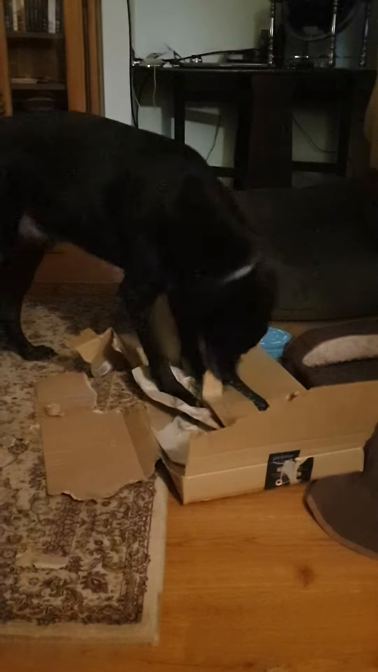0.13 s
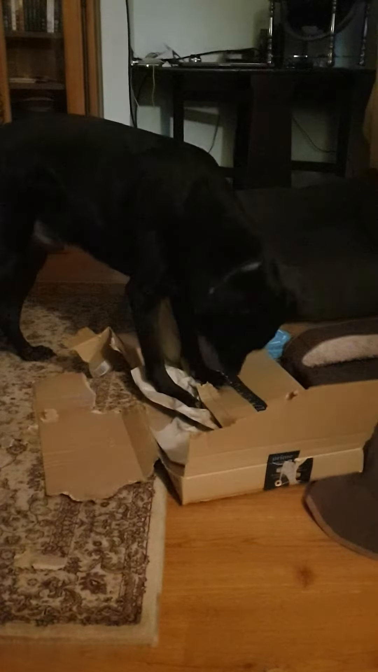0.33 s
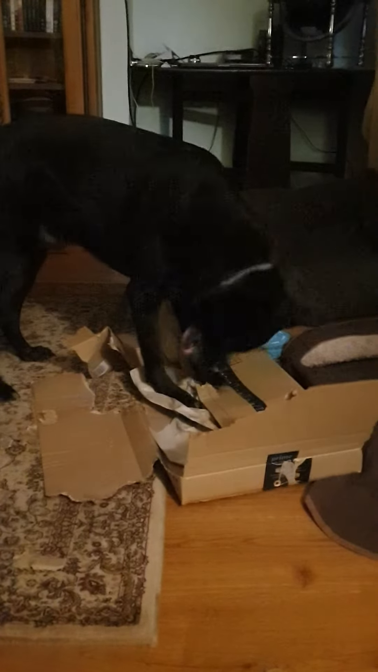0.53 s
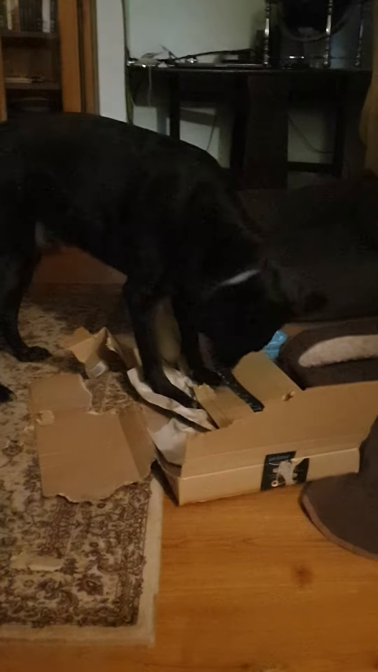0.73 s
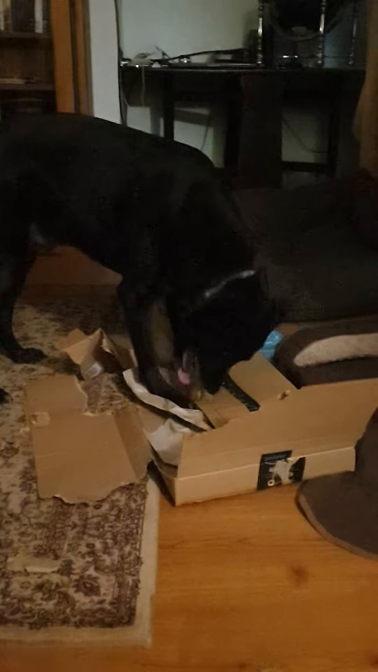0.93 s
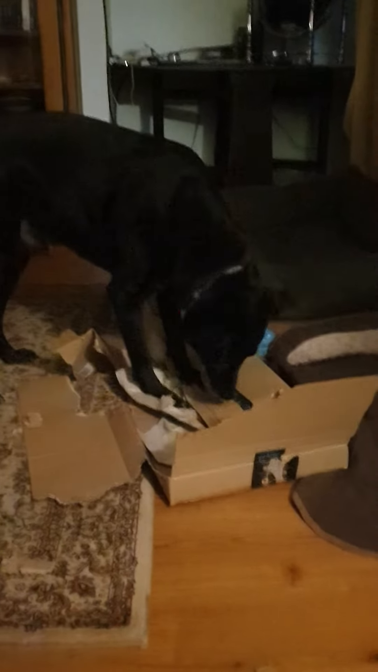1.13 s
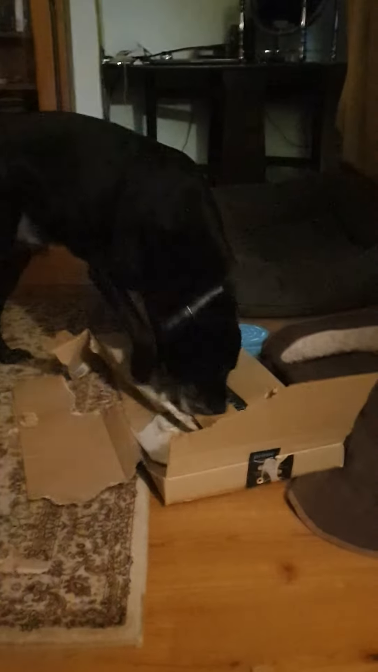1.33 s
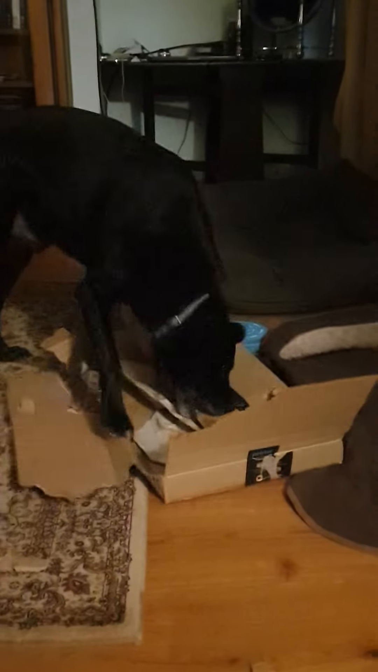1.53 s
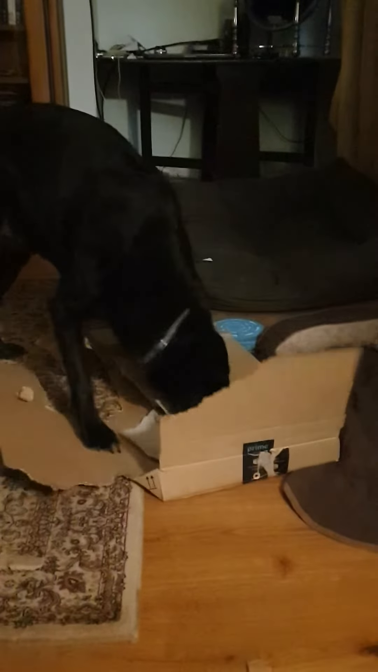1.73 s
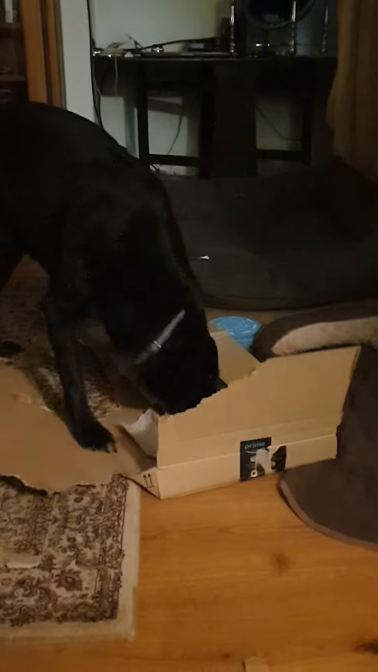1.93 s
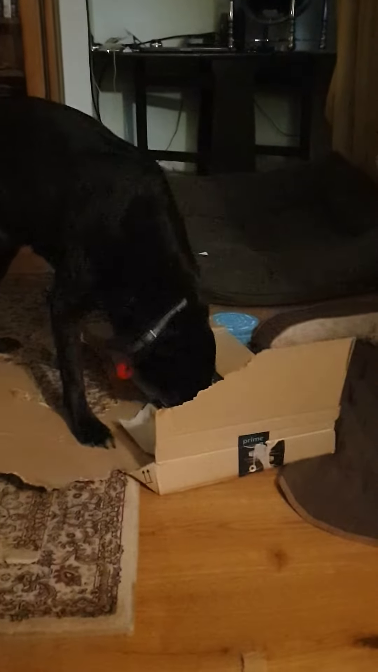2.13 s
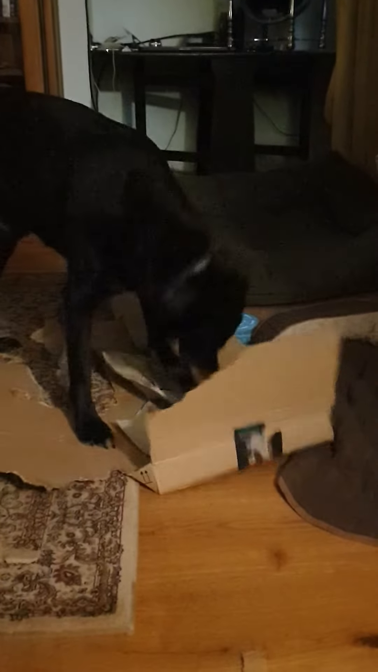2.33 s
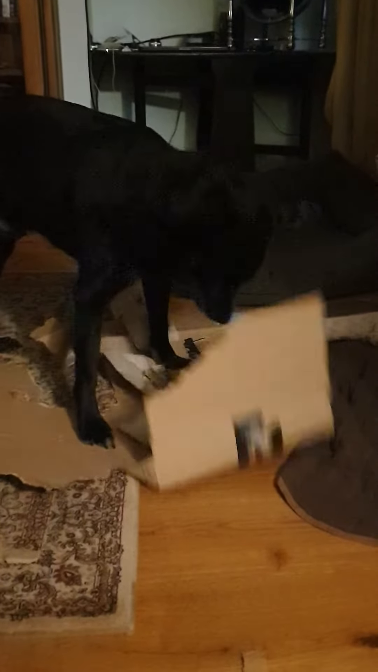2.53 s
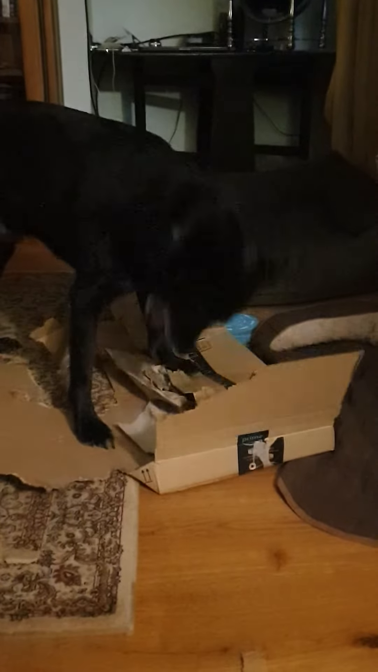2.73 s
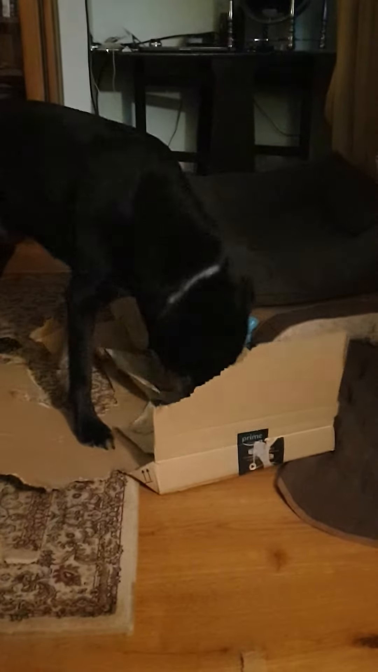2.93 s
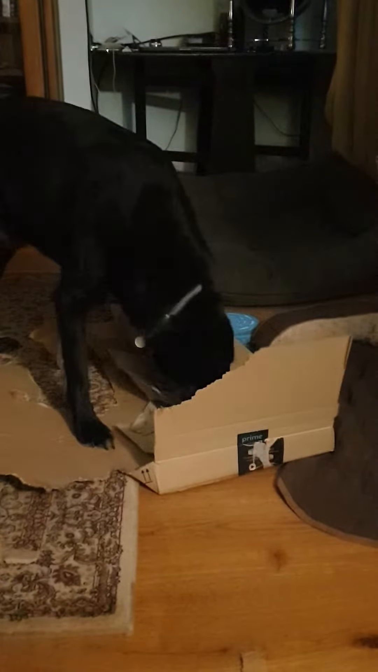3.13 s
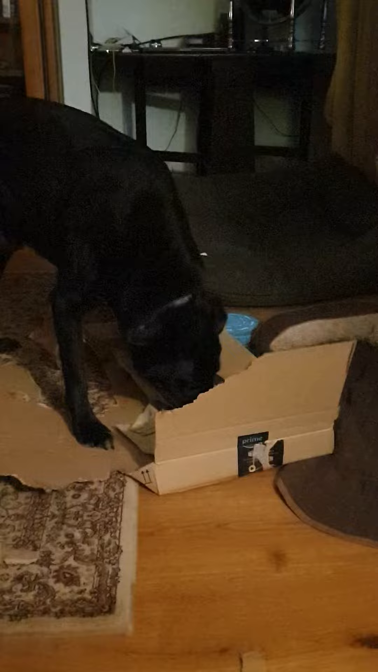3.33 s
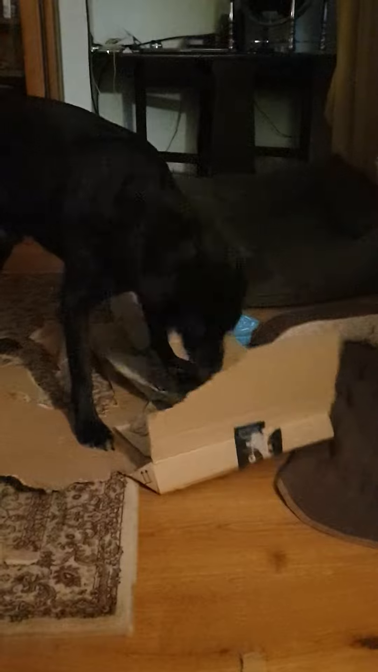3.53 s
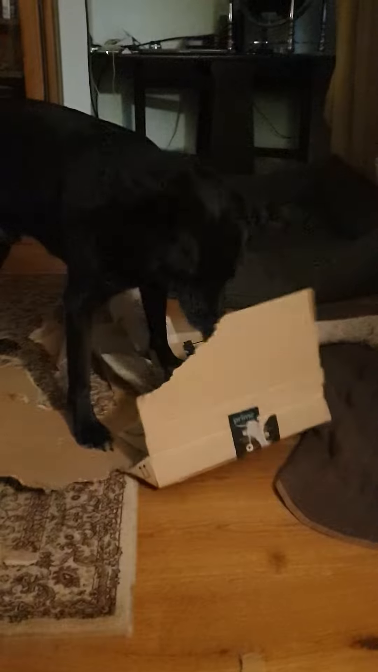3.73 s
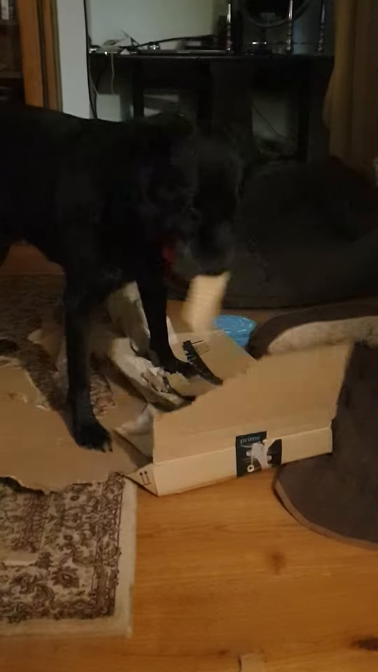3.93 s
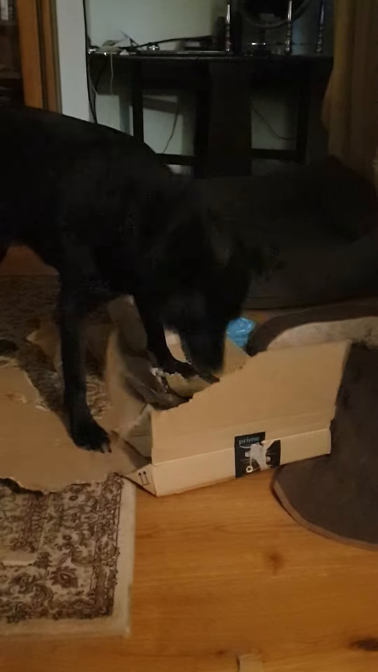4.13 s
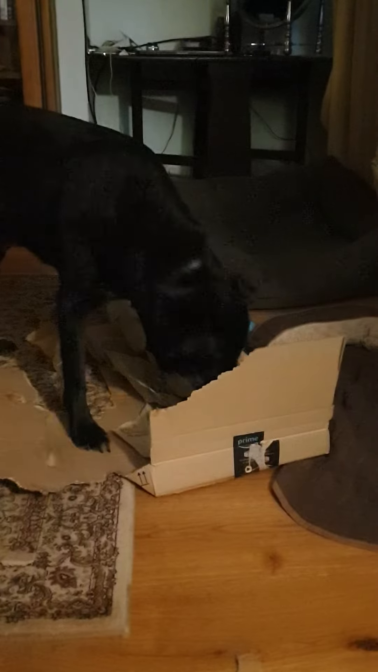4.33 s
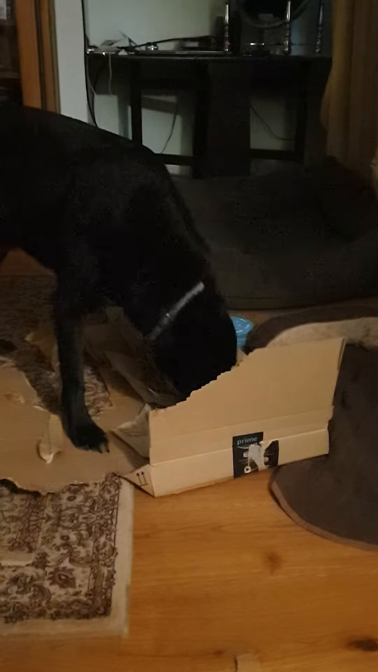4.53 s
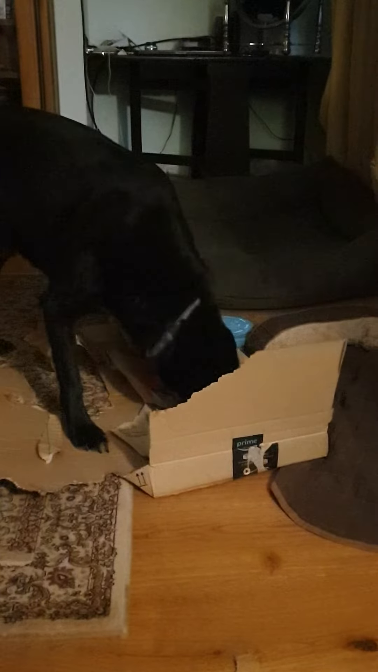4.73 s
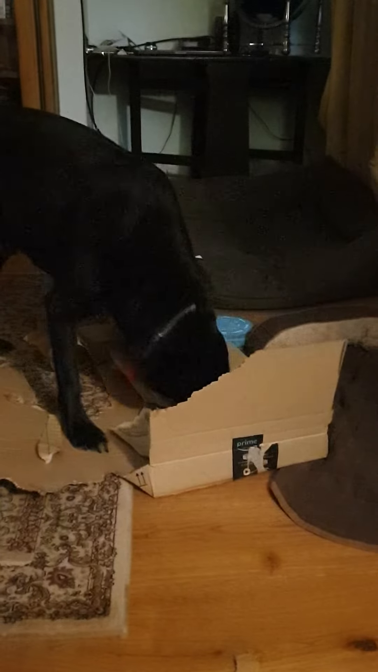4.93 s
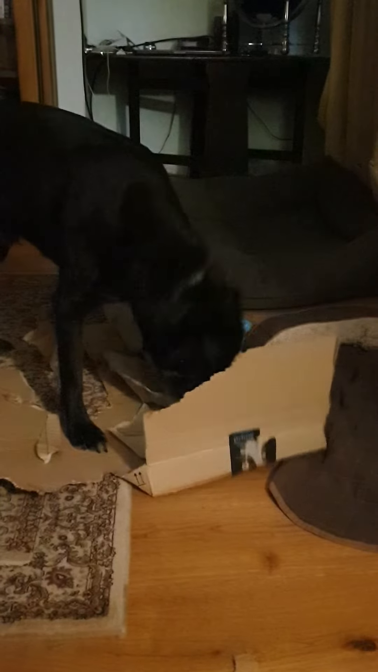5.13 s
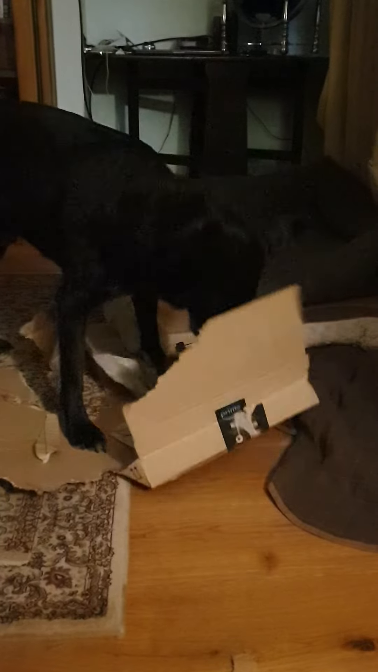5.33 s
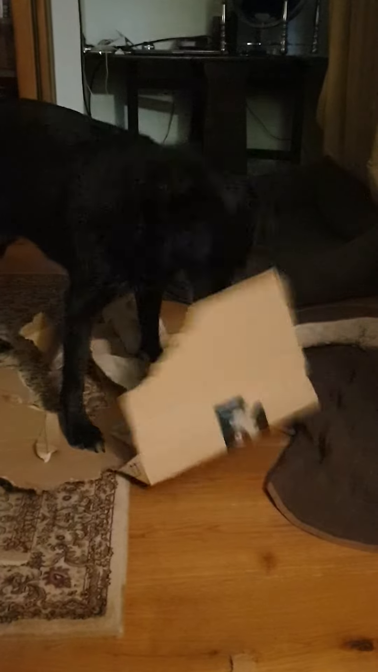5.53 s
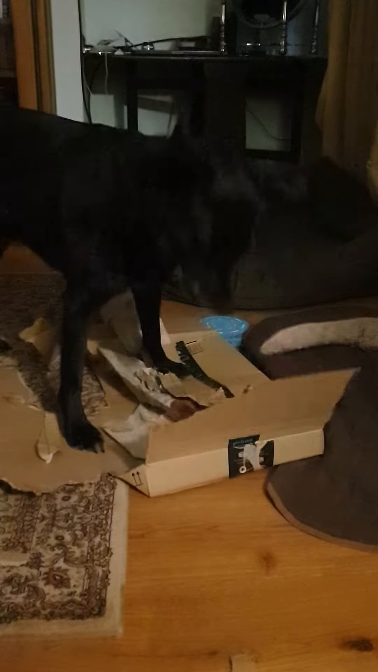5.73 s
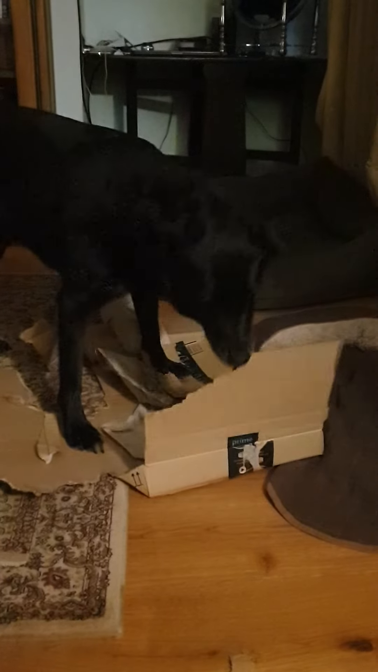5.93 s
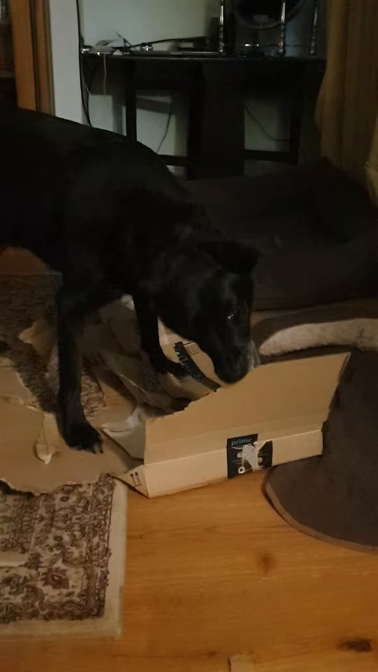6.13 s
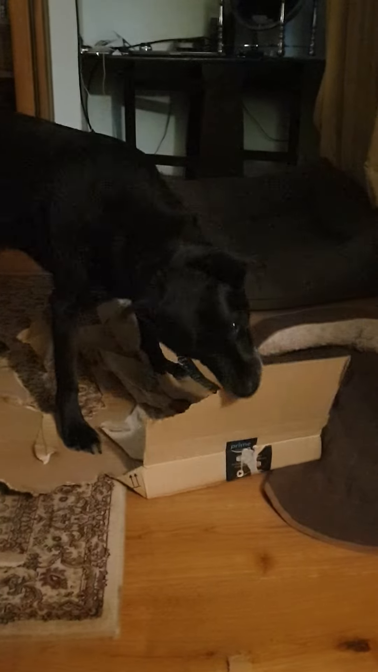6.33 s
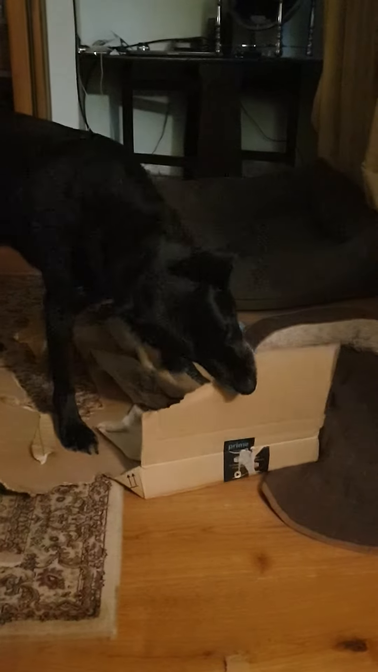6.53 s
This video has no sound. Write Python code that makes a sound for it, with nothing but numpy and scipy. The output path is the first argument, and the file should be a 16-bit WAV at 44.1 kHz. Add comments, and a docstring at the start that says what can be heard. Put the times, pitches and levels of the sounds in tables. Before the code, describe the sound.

Cardboard rips and buckles in irregular bursts as a dog pulls a box apart indoors. After a first short tear and a lull of light paper rustling, the box is repeatedly wrenched, dragged and knocked against the floor. Between the tugs come soft nuzzling, small tooth clicks and a faint metal tag, then a last few crunches. The microphone is a couple of metres off, with slight room echo.

```python
"""Dog tearing up a cardboard box

A dog rips at a box on a living-room floor, rooting in the packing paper between tugs.
Fibres snap in dense crackles, folds buckle with hollow knocks, teeth tick, a collar tag chinks
and dragged walls groan. From a couple of metres away the room's reflections blend with the moving box."""
import sys
import numpy as np
from scipy import signal
from scipy.fft import rfft, irfft
from scipy.io import wavfile
from scipy.ndimage import uniform_filter1d

SR = 44100
rng = np.random.default_rng(int(sys.argv[2]) if len(sys.argv) > 2 else 0)


def persist_wave(psi):
    """Save psi, clipped to +-1, as 16-bit WAV."""
    counts = np.round(np.clip(psi, -1, 1) * 32767).astype(np.int16)
    wavfile.write(sys.argv[1], SR, np.atleast_2d(counts).T)


N = 294147
RING = 2 ** 14   # samples in an impulse response
FREQS = np.maximum(np.arange(RING // 2 + 1) * SR / RING, 1)
CONTROL_RATE_HZ = 1000


def from_db(db):
    """Decibels to gain."""
    return 10 ** (np.asarray(db) / 20)


def unit(x):
    """Scale to an average energy of one per channel."""
    return x / np.sqrt(np.mean(np.sum(x ** 2, axis=-1)) + 1e-20)


def at_hz(points, hz):
    """Read a curve on a log-frequency axis."""
    f, value = np.transpose(points)
    return np.interp(np.log(hz), np.log(f), value)


def drift(rate_hz):
    """Smooth random modulation with a spread of one."""
    pole = np.exp(-2 * np.pi * rate_hz / SR)
    slow = signal.lfilter([1], [1, -2 * pole, pole * pole], rng.standard_normal(N + SR))[SR:]
    return slow / slow.std()


def response(colour):
    """Minimum-phase impulse response of unit energy, shaped by a gain curve over FREQS."""
    cepstrum = irfft(np.log(colour / colour.max() + 1e-5))
    cepstrum[1:RING // 2] *= 2
    cepstrum[RING // 2 + 1:] = 0
    return unit(irfft(np.exp(rfft(cepstrum))))


def through(x, ring):
    """Play a signal through an impulse response."""
    return signal.fftconvolve(x, ring, axes=-1)[..., :x.shape[-1]]


def band(low_hz, high_hz, order=4):
    """Gain of a flat band with sloping edges."""
    return ((1 + (low_hz / FREQS) ** (2 * order)) * (1 + (FREQS / high_hz) ** (2 * order))) ** -.5


def peak(hz, width_hz):
    """Gain of one resonance, one at its top."""
    return (1 + ((FREQS ** 2 - hz ** 2) / (FREQS * width_hz)) ** 2) ** -.5


def add(track, s, sound):
    """Mix a sound into a track at a time."""
    start = max(round(s * SR), 0)
    track[start:start + len(sound)] += sound[:max(N - start, 0)]


def snaps(per_s, spread_db):
    """Tiny fractures at random moments, most weak and a few strong; rms one at any rate."""
    sizes = from_db(spread_db * np.minimum(rng.exponential(1, N), 4))
    clicks = (rng.random(N) < per_s / SR) * sizes * rng.choice([-1, 1], N)
    return unit(clicks / np.sqrt(per_s)) * np.sqrt(N)   # sparser snaps hit harder


def steady(x, span_s):
    """Hold the running power of a crackle at one, as a steady pull would."""
    power = uniform_filter1d(x ** 2, max(int(span_s * SR), 1))
    return x / np.sqrt(np.abs(power) + 1e-4)


def splinter(decay_s, share):
    """One fracture and a quickly dying spray of smaller ones."""
    t = np.arange(RING) / SR
    spray = share * unit(rng.standard_normal(RING) * rng.exponential(1, RING) * np.exp(-t / decay_s))
    spray[0] += 1
    return spray


def hit(db, push, colour):
    """A push rings through a colour; the level is its energy spread over 10 ms."""
    return from_db(db) * np.sqrt(SR / 100) * unit(through(push, response(colour)))


def box_colour():
    """The broad colour of breaking board and paper, shaped by the resonances of the box."""
    # spectrum of the breaking material: (frequency [Hz], level [dB])
    board = [(30, -13.5), (45, 16), (160, -2.5), (300, 2.5), (550, -8.5), (1000, 3), (2050, 1.5),
             (2500, -4), (3100, -1.5), (5000, -7.5), (5900, -12.5), (7100, -12), (8700, -20.5),
             (11800, -14.5), (15500, -16)]
    # resonances of the box on the floor: (frequency [Hz], width [Hz], lift [dB])
    box_modes = [(60, 11, -1), (99, 90, 17), (169, 8.2, -5), (240.4, 13, 17.5), (337, 5.9, 11.5),
                 (419.2, 5.7, 12), (512, 130, 7), (575, 120, 12.5), (804.5, 11, 10.5), (840, 33, 2),
                 (924, 90, 7), (1271, 79, 3.5), (1680, 34, -19), (1683, 230, 1), (2062, 60, 2)]
    lift = sum((from_db(db) - 1) * peak(hz, width) ** 2 for hz, width, db in box_modes)
    return from_db(at_hz(board, FREQS)) * np.abs(1 + lift)


def strokes(rows, attack_s, walls_db):
    """Strokes take hold, swell or sag, and settle: power envelopes of walls, panels, fibres and hiss."""
    # release after a stroke: (walls [dB/s], panels [dB/s], fibres [dB/s], hiss [dB/s])
    settle_rates = [190, 230, 230, 280]
    clock, power = np.arange(0, N / SR, 1 / CONTROL_RATE_HZ), 0
    attacks_s = attack_s + np.array([[0.034], [0], [0], [0]])   # the heavy walls are slower to get going
    for s, length, db, swell_db, panels_db, hiss_db in rows:
        t = clock - s
        progress = np.clip(t / length, 0, 1)
        grip = np.clip(t / attacks_s, 0, 1) * from_db(db + swell_db * (progress - .5))
        parts_db = np.array([[panels_db + walls_db], [panels_db], [0], [hiss_db]])
        settle_db = np.outer(settle_rates, np.maximum(t - length, 0))
        power = power + (grip * from_db(parts_db - settle_db)) ** 2
    return power


def effort():
    """Rips, rooting and a faint stir add up: envelopes of walls, panels, fibres and hiss in dB."""
    # the jaws haul and the board rips: (time [s], length [s], fibre level [dB],
    # swell from start to end [dB], panels over fibres [dB], hiss over fibres [dB])
    rips = [(0, 0.0098, -26.5, -16, 5, -4.5), (.04, 0.055, -36.5, -2, -3.5, -0.5),
            (.112, 0.05, -34, -1.5, 2, 1), (2.135, 0.078, -40, -3.5, -2.5, -0.5),
            (2.315, 0.031, -39, -9, 3.5, 2), (2.45, 0.068, -28.5, 1.5, -4.5, -2),
            (2.6, 0.019, -36, 2.5, 0, -8), (3.598, 0.15, -33.5, -3.5, 1.5, 3.5),
            (3.782, 0.063, -33.5, 0.5, 2.5, 3), (5.047, 0.023, -37.5, -3, -15, 1),
            (5.18, 0.31, -39, 4.5, 1.5, 3), (5.553, 0.074, -33, -3.5, 1, -1.5)]
    # the muzzle roots in the paper and shoves the box: same columns
    rootings = [(.25, 0.8, -81.5, 2, 5.5, 7.5), (.57, 0.045, -67, -1.5, -12, 11.5),
                (.73, 0.11, -58.5, 1, -23, 1.5), (.82, .16, -58, -2.5, -11, -2),
                (1.02, 0.097, -75, 9, -6.5, 9.5), (1.29, 0.083, -52.5, 6, -0.5, -1.5),
                (1.53, 0.045, -49.5, 3, -2, 1), (1.645, 0.018, -47.5, 2.5, 5, -1.5),
                (1.7, 0.15, -57.5, -2, 2.5, -1.5), (1.91, 0.19, -53, -3, 5.5, 1),
                (2.22, 0.34, -44.5, 17, 4, 5), (2.66, 0.14, -59, -5, 0, -6.5),
                (2.885, 0.024, -48.5, -13.5, 0, -13), (2.95, 0.14, -67.5, -6.5, -6, 5),
                (3.075, 0.19, -71.5, 5.5, 16, 7), (3.23, 0.082, -57.5, 14, 4.5, 1.5),
                (3.425, 0.23, -57.5, -4.5, 2.5, -1), (3.87, 0.21, -53.5, -24, -1, -7),
                (4.14, .18, -86.5, 3.5, 15, 6.5), (4.36, 0.073, -64.5, -3, 11.5, 8.5),
                (4.52, .13, -91, 11, 5, 17), (4.66, 0.29, -59, 17, 10, 1.5), (5, 0.28, -50.5, 0.5, 4, 3.5),
                (5.68, 0.22, -59, -19.5, -0.5, -7.5), (5.91, .11, -73.5, -7, 15.5, 9.5),
                (6.09, 0.47, -71, 1.5, 1, 3), (6.3, 0.38, -56.5, -1.5, 4, 4.5),
                (6.57, 0.21, -51, -5.5, -0.5, -8)]
    # constant stir under the strokes: (walls [dB], panels [dB], fibres [dB], hiss [dB])
    stir_db = [-91.5, -80, -85.5, -75.5]
    hauling = strokes(rips, attack_s=0.0077, walls_db=0)
    rooting = strokes(rootings, attack_s=0.017, walls_db=-6)   # flexes the box less than a haul
    levels_db = 10 * np.log10(hauling + rooting + from_db(stir_db)[:, None] ** 2)
    steps = np.arange(N) / SR * CONTROL_RATE_HZ
    return [np.interp(steps, np.arange(len(db)), db) for db in levels_db]


def crinkle(clicks, colour, width_share):
    """Each snap belongs to a scrap of its own size, which favours one pitch within the colour."""
    pitches = np.geomspace(1400, 5500, 6)
    scrap, out = rng.integers(0, len(pitches), N), 0
    for k, hz in enumerate(pitches):
        tint = colour * peak(hz, width_share * hz)
        out = out + through(clicks * (scrap == k), response(tint) * np.linalg.norm(tint))
    return unit(out) * np.sqrt(N)


def tearing(box):
    """Slips shake the walls and panels while fibres part; all catch and let go together."""
    wall_db, panel_db, fibre_db, hiss_db = effort()
    pull = from_db(.42 * (fibre_db - fibre_db.max()))   # a harder pull breaks more fibres a second
    slips = snaps(per_s=900 * np.sqrt(pull), spread_db=2.0)
    fibres = snaps(per_s=3000 * pull, spread_db=2.5)
    rubbing = snaps(per_s=15000, spread_db=4.0)
    # the walls rumble, and only large swings of the box pump air
    flex = steady(through(slips, response(box * band(85, 330, order=3))), span_s=0.12)
    heave = steady(through(rubbing, response(peak(55, 28) * band(30, 91))), span_s=0.12)
    walls = flex * from_db(wall_db) + heave * from_db(1.313 * wall_db)
    # gentle rubbing only wakes the hollow of the box; a hard pull shakes all its panels
    hollow = response(box * band(260, 1600) * peak(557, 380))
    nuzzle = steady(through(rubbing + slips, hollow), span_s=0.057)
    wrench = steady(through(slips + fibres, response(box * band(260, 1700))), span_s=0.018)
    panels = (np.sqrt(1 - pull) * nuzzle + np.sqrt(pull) * wrench) * from_db(panel_db)
    # parting fibres crackle under the hiss of the paper
    rip = steady(crinkle(fibres + .5 * slips, box * band(1500, 6600), width_share=0.66), span_s=0.041)
    hiss = steady(through(fibres + rubbing, response(box * band(6300, 13000))), span_s=0.024)
    paper = rip * from_db(fibre_db) + hiss * from_db(hiss_db)
    catching = from_db(1.4 * drift(rate_hz=50))
    return (walls + panels + paper) * catching


def creasing(box):
    """Small creases knock and thick strands snap at random, riding the level of the strokes."""
    _, panel_db, fibre_db, _ = effort()
    creases = through(snaps(per_s=24, spread_db=4.0), response(box * band(350, 1000)))
    strands = through(snaps(per_s=70, spread_db=2.5), response(box * band(1500, 6500)))
    return creases * from_db(panel_db - 7.5) + strands * from_db(fibre_db - 9.5)


def buckling(box):
    """A fold cracks and sprays, its panel rings with an overtone, and the whole box thumps."""
    # folds giving way and the box knocking about:
    # (time [s], thump level [dB], thump pitch [Hz], panel level [dB], panel pitch [Hz], crack level [dB])
    buckles = [(0.04, -33.5, 202, -41, 785, -33), (0.121, -49, 270, -27, 452, -44),
               (0.148, -38, 285, -15.5, 380, -44), (0.169, -38.5, 281, -19.5, 450, -24.5),
               (0.499, -71, 250, -57.5, 517, -64), (1.028, -59, 230, -73.5, 515, -74),
               (1.521, -94, 250, -31, 626, -55), (1.727, -41, 132, -30, 490, -59),
               (1.884, -49, 230, -41, 587, -54), (1.934, -41, 200, -42.5, 537, -58),
               (2.127, -45, 201, -38, 870, -36), (2.139, -60, 226, -25, 557, -31),
               (2.428, -47, 180, -26, 657, -52), (2.456, -20, 190, -23.5, 640, -27),
               (2.49, -38.5, 188, -19, 870, -21), (2.517, -19.5, 147, -31, 686, -34),
               (2.548, -25, 145, -27.5, 540, -46), (2.616, -41, 160, -24.5, 920, -31),
               (3.126, -44.5, 119, -55, 620, -62), (3.603, -25.5, 194, -44, 1170, -26.5),
               (3.796, -55, 150, -29, 925, -40), (3.867, -27.5, 116, -48, 633, -52.5),
               (3.911, -37.5, 131, -33, 654, -33.5), (4.368, -59, 261, -33.5, 616, -48.5),
               (4.381, -56.5, 149, -39.5, 660, -59), (4.714, -40, 102, -47.5, 680, -56),
               (4.762, -36.5, 243, -39, 451, -45.5), (5.047, -37, 138, -24, 590, -37.5),
               (5.058, -31, 130, -20, 550, -26), (5.184, -37, 200, -25, 574, -36),
               (5.244, -33, 117, -38, 480, -30.5), (5.389, -20.5, 111, -43, 600, -56),
               (5.569, -21.5, 154, -17, 574, -35.5), (5.643, -29.5, 190, -25, 796, -44),
               (5.913, -53, 140, -45.5, 760, -77), (6.309, -27, 247, -29, 680, -44),
               (6.416, -43, 50, -41.5, 1160, -45), (6.479, -48, 111.4, -42, 1190, -50),
               (6.563, -43, 178, -42, 730, -66), (6.656, -34.5, 99, -55.5, 497, -40)]
    out = np.zeros(N)
    coupling = np.sqrt(box)   # a single panel is only loosely coupled to the rest of the box
    for s, thump_db, thump_hz, panel_db, panel_hz, crack_db in buckles:
        body = coupling * band(57, 240) * peak(thump_hz, .5 * thump_hz)
        modes = peak(panel_hz, 0.23 * panel_hz) + 0.2 * peak(1.9 * panel_hz, 0.45 * panel_hz)
        thump = hit(thump_db, splinter(decay_s=0.031, share=0.22), body)
        panel = hit(panel_db, splinter(decay_s=0.0011, share=0.76), coupling * band(210, 2300) * modes)
        crack = hit(crack_db, splinter(decay_s=0.0013, share=1.4), box * band(1000, 6200))
        spray = hit(crack_db - 3.5, splinter(decay_s=0.0015, share=0.51), box * band(5500, 15000))
        add(out, s, thump + panel + crack + spray)
    return out


def ticking():
    """Small hard contacts, each with one resonance: wide ones snap, narrow ones ring hollow."""
    # teeth and loose scraps on the board: (time [s], level [dB], pitch [Hz], width [Hz])
    ticks = [(0.328, -61, 2360, 60), (0.501, -54.5, 2420, 606), (.511, -50, 2160, 405),
             (.554, -55, 1890, 2400), (0.687, -54, 2830, 1230), (0.737, -42.5, 4900, 1980),
             (0.841, -55, 1490, 300), (1.091, -56, 5880, 3000), (1.118, -52, 4500, 3920),
             (1.521, -37, 1430, 500), (2.726, -41.5, 1990, 500), (2.777, -45, 2020, 298),
             (2.788, -46.5, 1180, 250), (2.838, -43.5, 1670, 1270), (2.898, -45.5, 4870, 4780),
             (2.998, -48.5, 5940, 4030), (3.601, -44, 9300, 9000), (3.977, -45.5, 6550, 6000),
             (4.035, -54, 5120, 610), (4.076, -44.5, 946, 89), (4.368, -60, 1370, 593),
             (5.749, -50, 4550, 800), (5.913, -69, 1630, 400), (6.136, -50.5, 960, 70),
             (6.31, -33, 1160, 346)]
    out = np.zeros(N)
    for s, db, hz, width_hz in ticks:
        colour = peak(hz, width_hz) * band(hz / 2, 2 * hz + width_hz, order=2)
        add(out, s, hit(db, splinter(decay_s=0.0069, share=0.071), colour))
    return out


def collar_tag():
    """The metal tag chinks thin and high as the head jerks."""
    # the tag touching its ring: (time [s], level [dB])
    chinks = [(.875, -60), (1.58, -52), (2.972, -54), (3.005, -59), (4.035, -66), (4.083, -56), (4.32, -62),
              (4.345, -64), (4.37, -57), (5.922, -51), (5.948, -58)]
    # modes of the tag: (frequency [Hz], level [dB], t60 [s])
    tag_modes = [(7176, -18, .04), (11300, -3, .05), (11430, 0, .05)]
    out, t = np.zeros(N), np.arange(RING) / SR
    for s, db in chinks:
        for hz, mode_db, t60 in tag_modes:
            envelope = from_db(db + mode_db + rng.normal(0, 2) - 60 * t / t60)
            add(out, s, envelope * np.sin(2 * np.pi * hz * t))
    return out


def dragging(wobble, roughness):
    """An edge sticks and slips at the wall's own pitch, unevenly: a short hollow groan."""
    # a wall hauled along: (time [s], length [s], level [dB], start pitch [Hz], end pitch [Hz])
    drags = [(2.315, 0.065, -43, 224, 210), (2.445, 0.048, -25, 239.7, 221),
             (2.54, 0.1, -37.5, 163.3, 186.4), (3.603, 0.095, -31.5, 242, 198),
             (3.79, 0.091, -33, 194.2, 237), (5.195, 0.084, -33.5, 202.4, 226.7),
             (5.328, 0.14, -33, 235, 237)]
    out, stray, grip = np.zeros(N), drift(rate_hz=60), drift(rate_hz=35)
    for s, length, db, start_hz, end_hz in drags:
        count = int(length * SR)
        here = int(s * SR) + np.arange(count)
        hz = np.linspace(start_hz, end_hz, count) * (1 + wobble * stray[here])
        phase = 2 * np.pi * np.cumsum(hz) / SR
        groan = (np.sin(phase) + 0.38 * np.sin(2 * phase)) * (1 + roughness * grip[here])
        add(out, s, from_db(db) * np.sqrt(2) * groan * signal.windows.tukey(count, .5))
    return out


def reflections(t60_scale, delay_s):
    """Stereo scatter that dies away band by band, centred in the bass and wide above."""
    # the room's decay before scaling: (frequency [Hz], t60 [s])
    room_t60 = [(60, .36), (250, .31), (1000, .31), (4000, .31), (8000, .27), (15000, .21)]
    # likeness of left and right reflections: (frequency [Hz], correlation [-1..1])
    likeness = [(60, 1), (150, 0.98), (330, 0.79), (700, 0.19), (1400, -0.063), (3000, -0.038),
                (8000, 0.047)]
    t = np.maximum(np.arange(RING) / SR - delay_s, 0)
    centres, out = np.geomspace(40, 16000, 18), 0
    for hz, row in zip(centres, np.eye(len(centres))):
        share = np.sqrt(np.interp(np.log(FREQS), np.log(centres), row))
        decay = (t > 0) * from_db(-60 * t / (t60_scale * at_hz(room_t60, hz)))
        mid, side = irfft(rfft(rng.standard_normal((2, RING))) * share) * decay
        alike = np.clip(at_hz(likeness, hz), -1, 1)
        pair = np.sqrt(1 + alike) * unit(mid) + np.sqrt(1 - alike) * unit(side) * [[1], [-1]]
        out = out + pair * np.linalg.norm(share)
    return unit(out)


def room(x, near_db, far_db, move_rate_hz, spots):
    """The sound jumps among spots on the box, each with a direct path, near scatter and wall echoes."""
    activity = np.exp(2 * np.array([drift(move_rate_hz) for _ in range(spots)]))
    shares = activity / activity.sum(axis=0)
    spread = np.linalg.norm(shares, axis=0)   # unrelated echoes add in power, direct sound in amplitude
    direct, echoes = np.zeros((2, N)), 0
    for spot, share in enumerate(shares):
        near = from_db(near_db) * reflections(t60_scale=0.15, delay_s=0.00071)
        far = from_db(far_db) * reflections(t60_scale=0.74, delay_s=.009)
        echoes = echoes + through((x * share / spread)[None], near + far)
        add(direct[0], spot / 2 / SR, x * share)   # the spot's place sets the left-right lag
        add(direct[1], (spots - 1 - spot) / 2 / SR, x * share)
    return (direct + echoes) / np.sqrt(1 + from_db(near_db) ** 2 + from_db(far_db) ** 2)


def room_tone(db):
    """A faint stereo bed of low rumble and hiss."""
    # colour of the quiet room: (frequency [Hz], relative level [dB])
    spectrum = [(30, -5), (100, 15), (300, -25), (1000, -8), (3000, -9.5), (8000, -4), (15000, -19.5)]
    ring = response(from_db(at_hz(spectrum, FREQS)))
    return from_db(db) * through(rng.standard_normal((2, N)), ring[None])


def microphones(x):
    """The two microphone ports colour left and right slightly differently."""
    # stereo balance: (frequency [Hz], left minus right [dB])
    balance = [(60, 0.5), (200, 1), (380, 0), (700, 2.5), (1290, -2), (2400, 2), (4400, -0.5), (8100, 3.5),
               (15000, 5.5)]
    tilts = [from_db(side * at_hz(balance, FREQS) / 2) for side in (1, -1)]
    ports = np.array([response(tilt) * np.sqrt(np.mean(tilt ** 2)) for tilt in tilts])
    return through(x, ports)


def scene():
    """The dog and the box in the room, over a faint room tone."""
    box = box_colour()
    cardboard = tearing(box) + creasing(box) + dragging(wobble=0.044, roughness=0.38) + buckling(box)
    sources = cardboard + ticking() + collar_tag()
    heard = room(sources, near_db=1.0, far_db=0.96, move_rate_hz=30, spots=9)
    return microphones(heard + room_tone(db=-76))


def record(dry):
    """A steep low-pass takes off the very top."""
    cutoff_hz = 15950
    return signal.sosfilt(signal.ellip(12, .1, 80, cutoff_hz, fs=SR, output="sos"), dry)


dry = scene()
out = record(dry)
persist_wave(out)
```